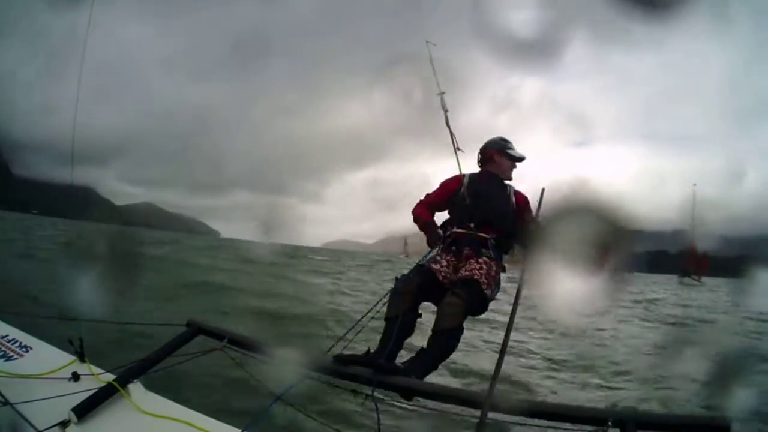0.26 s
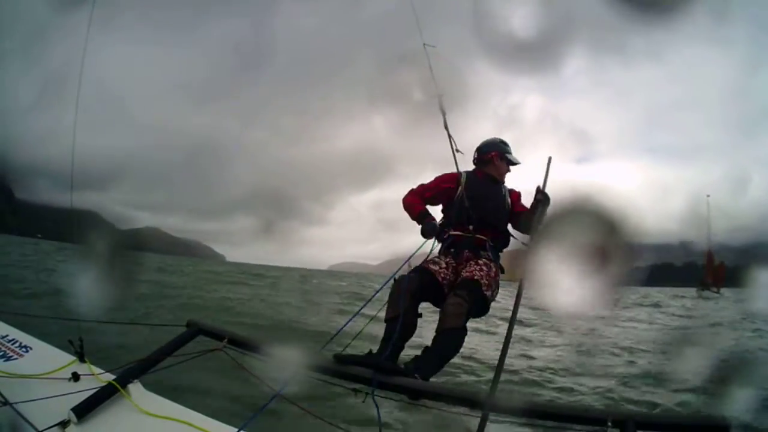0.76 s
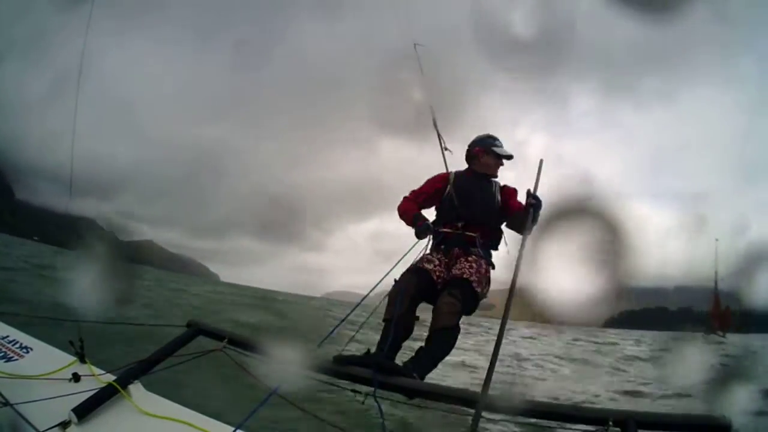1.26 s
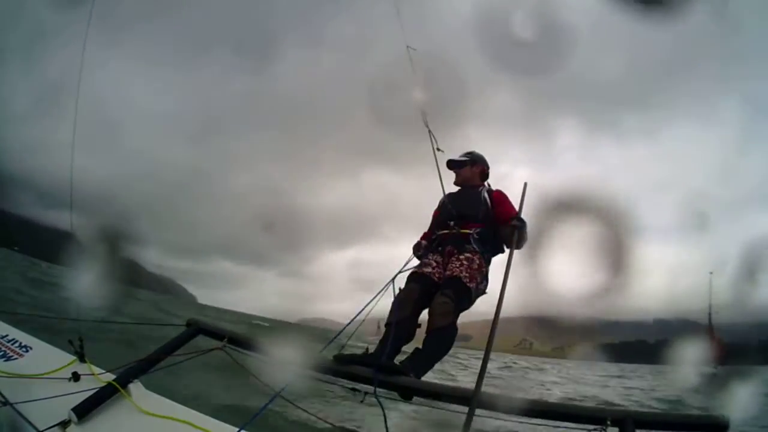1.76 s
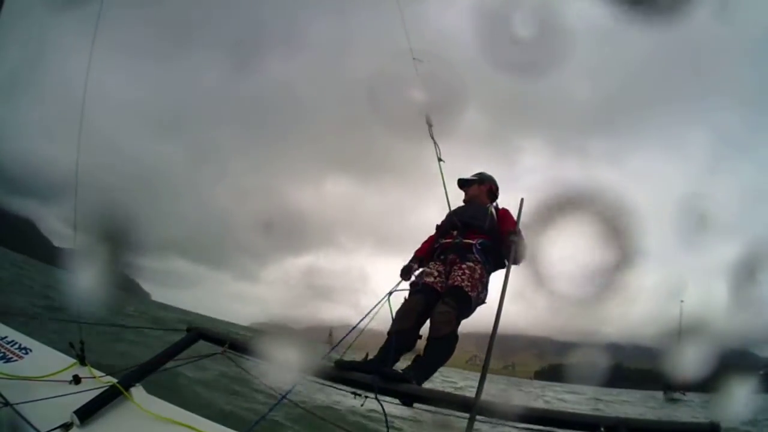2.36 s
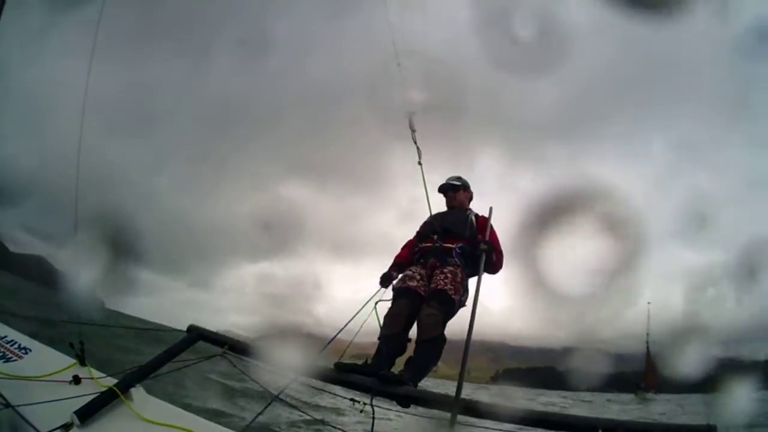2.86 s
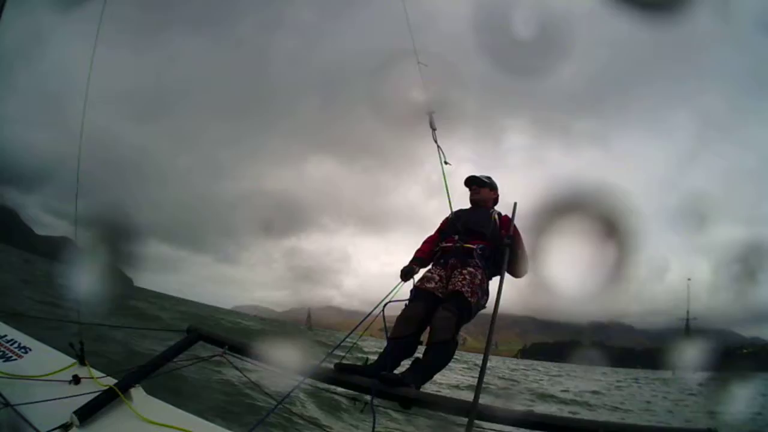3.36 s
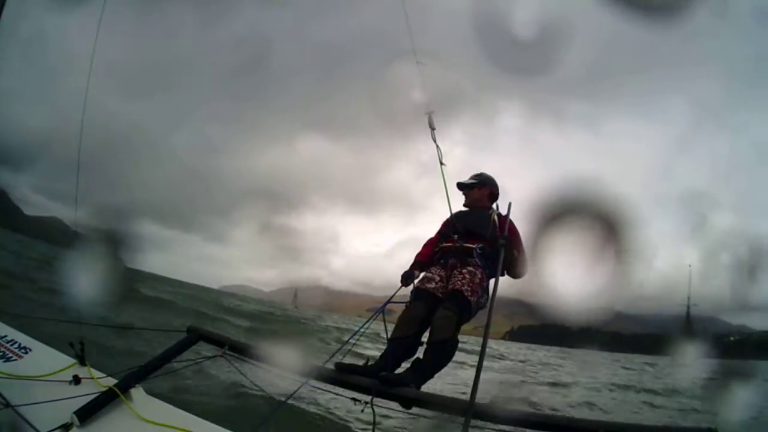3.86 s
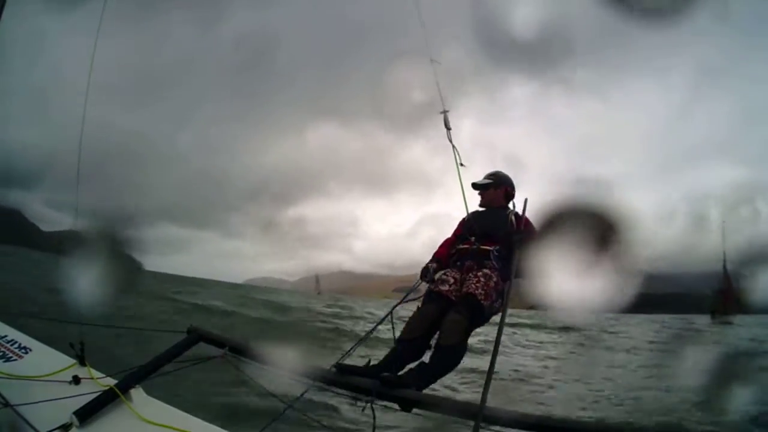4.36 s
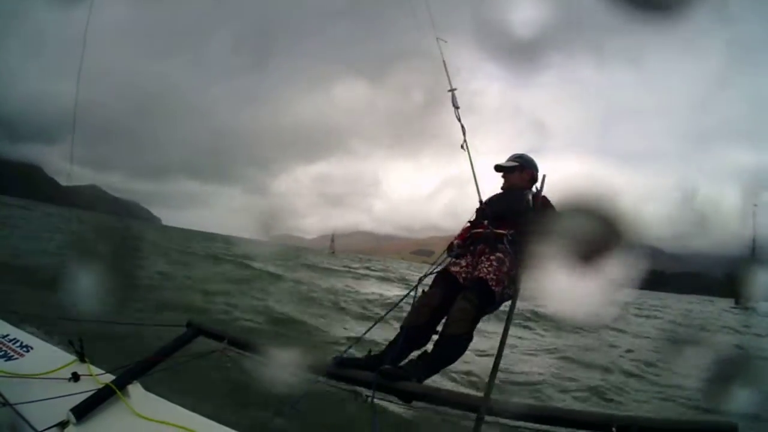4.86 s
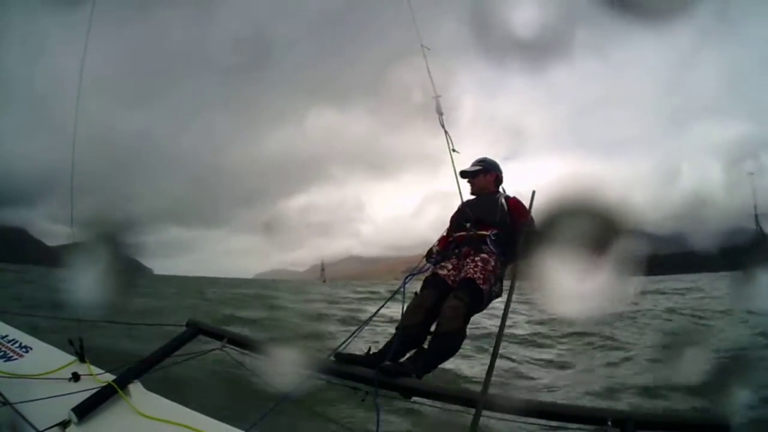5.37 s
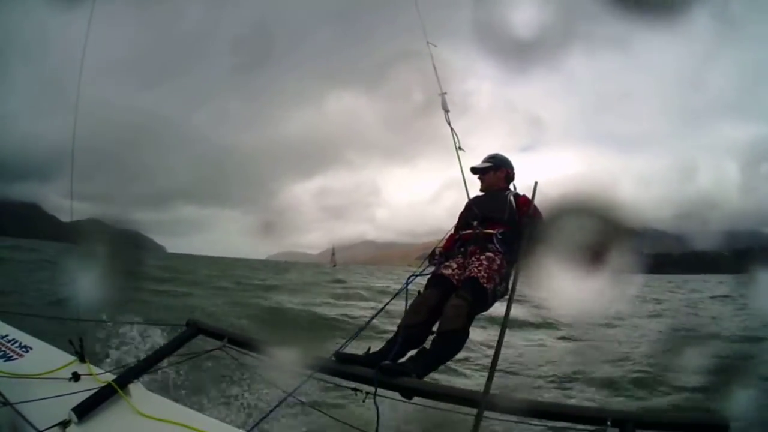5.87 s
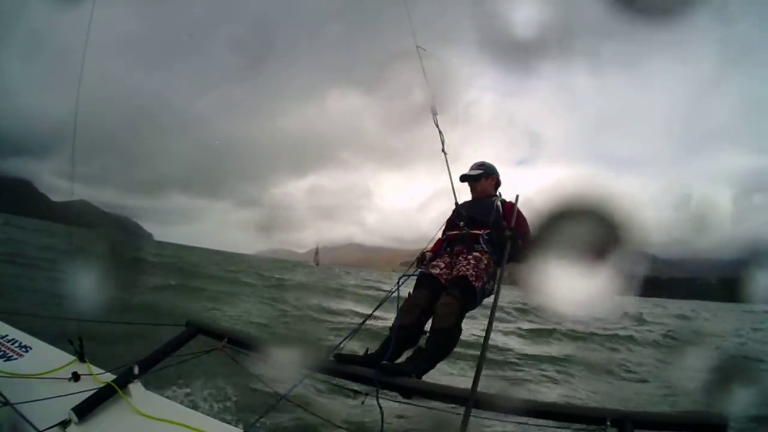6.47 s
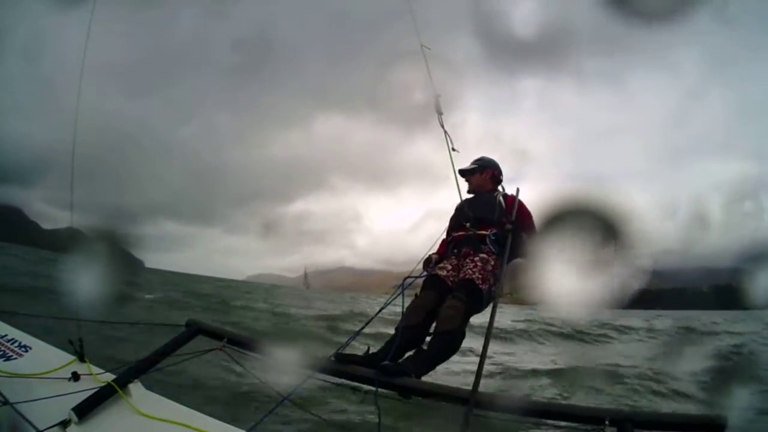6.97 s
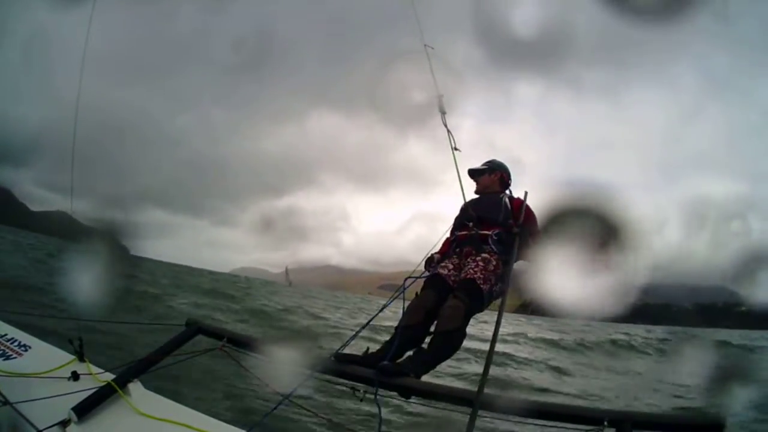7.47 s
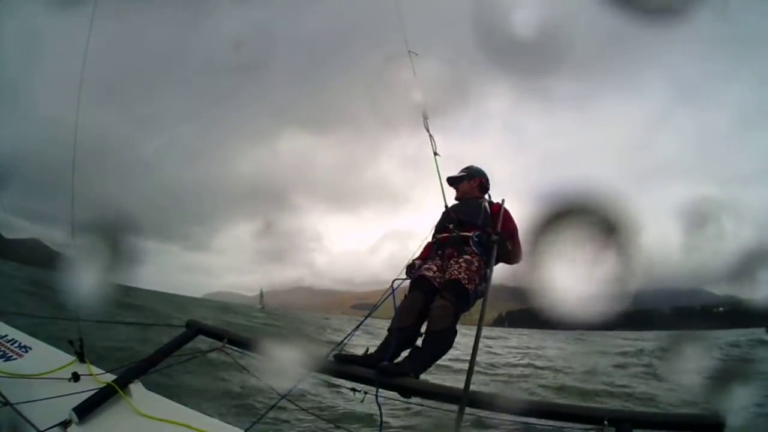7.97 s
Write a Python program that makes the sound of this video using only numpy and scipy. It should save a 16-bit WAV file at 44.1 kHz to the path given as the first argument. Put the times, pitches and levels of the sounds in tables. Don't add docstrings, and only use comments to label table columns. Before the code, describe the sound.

On the deck of a small fast dinghy in choppy water, a sealed-in microphone hears everything through the hull: boxy, dull on top, distorting on the hardest blows. From 0 to 1.7 s there is soft rushing wash, faint spray patter, very low wind and a few hollow laps. At 1.75 s a loud knock and snap begin a dense passage until about 2.9 s: rumbling hull flex, slosh, creaking rigging, short panel groans and quick irregular ratchet clicks. From 3 to 4.4 s it settles to wash with light slaps and ticks. At 4.5 s a violent jolt leads into a rope squeak, rising and wavering until 4.8 s, with another bang at 4.65 s. Then water slaps continue, with a sharp crack at 6.2 s, knocks at 7.45 and 7.75 s, and a clattering, creaking burst from 8.0 to 8.2 s.

```python
import sys
import numpy as np
from scipy import signal
from scipy.fft import rfft, irfft, next_fast_len
from scipy.io import wavfile
from scipy.ndimage import map_coordinates

SR = 44100
rng = np.random.default_rng(int(sys.argv[2]) if len(sys.argv) > 2 else 0)


def how_loud(loudness_db):
    steps = np.asarray(loudness_db, float) / 20
    return 10 ** steps


def unload_audio(sound):
    columns = np.transpose(np.atleast_2d(sound))
    steps = np.round(np.clip(columns, -1, 1) * 32767)
    wavfile.write(sys.argv[1], SR, steps.astype(np.int16))


N = 362061


def unit(x):
    return x / np.sqrt(np.mean(x ** 2) + 1e-20)


def curves(rows):
    s, *columns = np.transpose(rows)
    return [np.interp(np.arange(N) / SR, s, column) for column in columns]


def wobble(rate, size=N):
    knots = rng.standard_normal(int(size * rate / SR) + 4)
    return map_coordinates(knots, [np.arange(size) * rate / SR])


def filtered(x, response):
    m = next_fast_len(N + SR // 2)
    return irfft(rfft(x, m) * response(np.fft.rfftfreq(m, 1 / SR)), m)[..., :N]


def body(modes, damp_hz=9000):
    def response(f):
        total = 0
        for k, (hz, width, db) in enumerate(modes):
            total = total + (-1) ** k * how_loud(db) * 1j * f * width / (hz * hz - f * f + 1j * f * width)
        return total / (1 + 1j * f / damp_hz) ** 2
    return response


def shaken(level_db, response, lumpy_db, rate):
    force = unit(how_loud(lumpy_db * wobble(rate)) * rng.standard_normal(N))
    gain = np.linalg.norm(response(np.arange(SR // 2))) / np.sqrt(SR // 2)
    return filtered(how_loud(level_db) * force, response) / gain


def ring(hz, t60, modes, scatter_db, t, focus_db=3):
    out = 0
    for mode_hz, _, db in modes:
        strength, detune = rng.standard_normal(2)
        level_db = db + scatter_db * strength - focus_db * abs(np.log2(mode_hz / hz))
        out = out + how_loud(level_db) * np.sin(2 * np.pi * mode_hz * (1 + 0.033 * detune) * t)
    out = out * how_loud(-60 * t / t60) * (1 - np.exp(-t / 0.00044))
    return out / np.abs(out).max()


def events_power(times, tops_db, loss_db):
    grid = np.arange(0, N / SR, .002)
    loss = loss_db(grid - np.array(times)[:, None])
    return grid, how_loud(2 * (np.array(tops_db)[..., None] - loss)).sum(-2)


# start_s, spray_db, wash_db (along the wetted hull)
UNDER_WAY = [(0, -56, -51), (0.35, -52.5, -49.5), (0.9, -51.5, -42.5), (1.2, -51, -49),
             (1.55, -49.5, -47.5), (2.1, -52, -45), (2.7, -49, -41.5), (3.4, -47.5, -46), (3.7, -52.5, -48),
             (4.1, -51.5, -47), (4.4, -54.5, -46), (5.1, -53, -49.5), (5.6, -53.5, -48), (5.74, -54, -53),
             (5.85, -52, -45.5), (6.5, -50.5, -45), (7.2, -51.5, -48), (8.21, -53.5, -46.5)]
# crest_s, flexing_db, slosh_db, width_s
WAVE_CRESTS = [(0.222, -37.5, -40, 0.058), (0.86, -41, -47, 0.074), (1.09, -52, -41, 0.027),
               (1.741, -32, -31.5, 0.061), (1.833, -26, -24, 0.011), (1.967, -29, -27.5, 0.073),
               (2.192, -27, -26.5, 0.034), (2.283, -25, -19.5, 0.023), (2.461, -33, -20, 0.027),
               (2.5, -27.5, -25, 0.038), (2.563, -30.5, -19.5, 0.012), (2.86, -36, -45, 0.066),
               (3.28, -38, -41.5, 0.11), (3.512, -37, -36.5, 0.096), (4.308, -36.5, -35, 0.04),
               (4.652, -28.5, -20.5, 0.012), (4.72, -35.5, -31, 0.18), (5.29, -41.5, -31.5, 0.022),
               (5.51, -33.5, -27.5, 0.063), (5.575, -37.5, -45, 0.049), (5.94, -42.5, -39, 0.14),
               (6.16, -33, -30, 0.069), (6.47, -42, -42, 0.02), (6.63, -31.5, -32.5, 0.021),
               (6.79, -33, -30, 0.054), (7.01, -34, -37, 0.027), (7.241, -43, -39, 0.044),
               (7.477, -29, -29.5, 0.061), (7.67, -36, -39, 0.039), (7.8, -38.5, -36.5, 0.097),
               (8.07, -30.5, -28, 0.064), (8.14, -38, -34, 0.076)]
# start_s, held_s, creak_db, rattle_db (of the housing, over the creak)
RIG_LOADS = [(0.6, 0.1, -49, -27), (0.799, 0.086, -49, -17), (1.042, 0.043, -42, -22),
             (1.683, 0.044, -34, -31), (1.748, 0.093, -28, -25), (1.92, .038, -28, -23),
             (1.963, 0.032, -24, -23), (2.012, 0.023, -27, -26.5), (2.18, 0.21, -25, -20.5),
             (2.359, 0.059, -37.5, -25), (2.44, 0.13, -22.5, -25), (2.575, 0.054, -26.5, -28),
             (2.842, 0.019, -27, -19), (2.885, 0.031, -36, -29), (2.93, 0.033, -40, -18),
             (3.05, 0.16, -41.5, -30), (3.2, 0.087, -39.5, -26), (3.46, 0.098, -37.5, -24),
             (4.26, 0.048, -44, -28), (4.539, 0.052, -23, -27), (4.651, 0.012, -18.5, -33),
             (4.68, 0.089, -28, -9), (4.84, 0.066, -38.5, -25), (5.37, 0.05, -40, -28),
             (5.432, .04, -35, -27), (5.478, 0.06, -29.5, -27), (5.545, .05, -35.5, -29),
             (5.79, 0.045, -41, -27), (5.94, 0.1, -38, -27), (6.126, 0.078, -28.5, -27),
             (6.455, 0.023, -49, -30), (6.741, 0.077, -32.5, -18.5), (6.97, 0.053, -39, -21),
             (7.442, 0.046, -25.5, -30), (7.632, 0.05, -34.5, -36), (7.768, 0.06, -32.5, -22),
             (7.996, 0.15, -25, -20), (8.15, .03, -34, -24), (8.195, .03, -26, -21)]


def drive():
    spray_db, wash_db = curves(UNDER_WAY)

    def wave_loss(u):
        return 11 * np.maximum(-u / 0.99, u) / width[:, None]

    def load_loss(u):
        tighten, ease = -u * 896.5, (u - held[:, None]) * 453.5
        return np.maximum(np.maximum(tighten, ease), 0)

    crest, flex_db, slop_db, width = np.transpose(WAVE_CRESTS)
    grid, (flex, slop) = events_power(crest, [flex_db, slop_db], wave_loss)
    start, held, load_db, rattle_db = np.transpose(RIG_LOADS)
    grid, (load, rattle) = events_power(start, [load_db, load_db + rattle_db], load_loss)

    def both(db, power):
        return 10 * np.log10(how_loud(2 * db) + np.interp(np.arange(N) / SR, grid, power))

    return both(wash_db + 1.1, flex), both(wash_db + 1, slop), both(wash_db + 0.8, load), both(spray_db, rattle)


# pitch_hz, width_hz, level_db
HULL_FLEX = [(30, 37, -11.5), (59.4, 29, -3.5), (113, 50, -3.5), (191.8, 60.5, -1)]
# pitch_hz, width_hz, level_db
HULL_BOTTOM = [(352.5, 70, -0.5), (408, 201, -6)]
# pitch_hz, width_hz, level_db
DECK = [(570.6, 133, -6), (719.6, 195, 2), (824, 82, 2.5), (880.4, 42, 1.5), (1024, 108, -0.5),
        (1120, 82, 2), (1300, 130, 1)]
# pitch_hz, width_hz, level_db
LOADED_DECK = [(720, 160, -5.5), (840, 110, 3.5), (990, 180, -3), (1110, 45, 4.5), (1240, 13, -4.5)]
# pitch_hz, width_hz, level_db
BLOCK_MOUNT = [(1040, 500, -5.5), (2110, 370, -0.5), (2560, 700, -9.5), (3920, 970, -23)]
# pitch_hz, width_hz, level_db
HOUSING = [(1576, 230, -5.5), (2184, 327, -4), (2705, 246, -1.5), (3223, 210, -8.5), (4060, 1200, -10.5),
           (4980, 1500, -19.5)]


def water():
    rumble_db, slosh_db, creak_db, spray_db = drive()
    surge = wobble(19)
    creak_db = np.minimum(creak_db, -21)
    load_db = np.clip(0.94 * (creak_db + 26.0), -20, 0)
    loaded_db = creak_db + load_db
    hum_db = creak_db + 7.65 - 0.32 * (load_db + 24.5) + 0.37 * surge
    chafe_db = loaded_db - 12.5 + np.minimum(spray_db + 47.0, 0)

    rumble = shaken(rumble_db - 0.6 + 1.2 * surge, body(HULL_FLEX, damp_hz=704), lumpy_db=-0.5, rate=24)
    slosh = shaken(slosh_db - 0.5 + surge, body(HULL_BOTTOM, damp_hz=1210), lumpy_db=2.5, rate=30)
    hum = shaken(hum_db, body(DECK, damp_hz=2330), lumpy_db=2.5, rate=90)
    creak = shaken(loaded_db - 1.5, body(LOADED_DECK, damp_hz=2510), lumpy_db=1.5, rate=54)
    chafe = shaken(chafe_db, body(BLOCK_MOUNT[1:3], damp_hz=4000), lumpy_db=4.5, rate=79)
    spray = shaken(spray_db - 0.6 + 0.49 * surge, body(HOUSING), lumpy_db=1.5, rate=120)
    breeze = filtered(rng.standard_normal(N), lambda hz: 1 / (1 + (hz / 60) ** 2))
    wind = how_loud(-52.5) * unit(breeze)
    return rumble + slosh + hum + creak + chafe + spray + wind


# start_s, peak_db, pitch_hz, t60_s
DECK_JOLTS = [(1.746, -4, 1056, 0.12), (1.919, -26, 1110, 0.17), (1.962, -2, 712, 0.12),
              (2.168, -12, 936, 0.12), (2.194, -15.5, 933, 0.1), (2.216, -11.5, 857, 0.34),
              (2.355, -19.5, 910, 0.13), (2.388, -14, 1026, 0.071), (2.446, -14.5, 770, 0.1),
              (2.484, -19, 1054, 0.21), (2.5595, 2.5, 928, 0.055), (2.843, -7, 911, 0.1),
              (2.891, -17.5, 798, 0.36), (2.913, -22, 1090, 0.056), (4.484, 5.5, 1110, 0.086),
              (4.545, -8, 855, 0.099), (4.646, 2.5, 876, 0.067), (4.732, -14.5, 1110, 0.083),
              (6.186, -2.5, 1027, 0.098), (7.441, -10.5, 1300, 0.12), (7.46, -0.5, 1110, 0.039),
              (7.758, -18.5, 907, 0.43), (7.994, -5, 1045, 0.12), (8.008, -10, 1013, 0.13),
              (8.063, 2, 998, 0.06), (8.193, -10, 1120, .09)]
# start_s, peak_db, pitch_hz
HULL_SLAPS = [(0.201, -13, 673), (0.912, -20, 1352), (1.555, -21.5, 714), (1.681, -24.5, 1384),
              (1.696, -14, 1300), (2.766, -19, 1292), (3.483, -30.5, 845), (4.221, -21, 774),
              (4.295, -22.5, 780), (4.411, -14.5, 1110), (4.896, -23, 863), (4.968, -17, 780),
              (5.064, -19, 807), (5.285, -18, 1224), (5.429, -21.5, 603), (5.478, -13.5, 866),
              (5.526, -13.5, 850), (5.897, -20.5, 678), (5.955, -14.5, 892), (6.131, -13, 782),
              (6.149, -12.5, 800), (6.278, -11.5, 1120), (6.375, -19.5, 658), (6.397, -19.5, 1110),
              (6.62, -20, 1284), (6.742, -19.5, 1370), (6.771, -13, 695), (6.954, -20, 1316),
              (6.985, -12, 840), (7.189, -10.5, 718)]
# start_s, peak_db, pitch_hz
BOW_LAPS = [(0.034, -24.5, 640), (0.06, -26.5, 1040), (0.466, -27.5, 1330), (0.698, -26, 1210),
            (0.839, -22.5, 727), (1.082, -22.5, 774), (1.406, -19.5, 1110), (3.042, -23, 687),
            (4.099, -24.5, 1250), (4.264, -27, 1110), (4.841, -20, 734), (5.345, -23, 733),
            (5.384, -23, 762), (5.657, -25, 1370), (5.933, -22, 820), (5.997, -18, 640), (6.029, -28, 750),
            (6.456, -21.5, 620), (7.249, -23, 670), (7.368, -21, 677), (7.394, -23, 1273),
            (7.418, -22, 1040), (7.53, -33, 1240), (5.565, -20, 1320), (5.587, -21, 1320),
            (5.788, -24, 700), (6.018, -22, 900), (6.04, -23, 800), (5.068, -20, 1150), (4.412, -22, 760),
            (6.986, -20, 1200)]


def knocks():
    out, t = np.zeros(N + SR), np.arange(SR // 5) / SR
    # t60 in s, then thud in dB
    blows = [(*row, -18) for row in DECK_JOLTS]
    blows += [(*row, 0.08, -11) for row in HULL_SLAPS]
    blows += [(*row, 0.061, -4.5) for row in BOW_LAPS]
    for s, db, hz, t60, thud_db in blows:
        panel = ring(hz, max(t60, .02), DECK + [(hz, 0, 12)], 2.5, t, focus_db=8)
        thud = how_loud(thud_db) * ring(360, .08, HULL_BOTTOM, 3, t)
        out[round(s * SR):][:len(t)] += how_loud(db - 5.0) * (panel + thud)
    return out[:N]


# start_s, length_s,
# peak_db, pitch_hz
PANEL_GROANS = [(1.756, 0.032, -21, 1051), (1.775, 0.053, -22.5, 798), (1.83, 0.027, -28, 1160),
                (1.909, .018, -27.5, 784), (2.017, 0.022, -16.5, 1073), (2.272, 0.031, -17.5, 944),
                (2.467, 0.07, -19.5, 1085), (2.579, 0.041, -21, 1007), (2.558, 0.012, -15, 1200),
                (2.85, 0.027, -17, 1140), (2.864, 0.015, -20.5, 802), (2.905, 0.015, -21, 1132),
                (4.486, 0.015, -11, 846), (4.649, .014, -12.5, 720), (4.676, 0.011, -12, 1300),
                (6.186, .012, -11.5, 1372), (6.19, 0.018, -13, 849), (6.275, 0.027, -29.5, 1138),
                (7.765, 0.016, -21, 927), (7.8, 0.063, -27, 1134), (8.025, .014, -16, 1040),
                (8.041, 0.019, -11.5, 1084), (8.0625, .024, -5.5, 760), (8.086, .013, -10.5, 1150),
                (5.53, .085, -30.5, 189.7), (5.88, 0.064, -36.5, 186), (7.64, .06, -35, 181),
                (4.68, .1, -31.5, 111.3), (1.968, .026, -15, 735), (6.283, 0.015, -24, 906),
                (4.492, .008, -8, 996), (8.077, 0.036, -13.5, 1120), (8.119, 0.03, -14.5, 1120),
                (8.19, 0.041, -16.5, 1120)]


def groans():
    out = np.zeros(N + SR)
    waver = np.pad(0.011 * wobble(200), (0, SR))
    flutter_db = np.pad(1.5 * wobble(180), (0, SR))
    for s, length, db, hz in PANEL_GROANS:
        span = slice(round(s * SR), round((s + max(length, .005)) * SR))
        swell = np.sin(np.linspace(0, np.pi, span.stop - span.start))
        phase = 2 * np.pi * np.cumsum(hz * (1 + waver[span])) / SR
        out[span] += how_loud(db + flutter_db[span]) * swell * np.sin(phase)
    return out[:N]


# start_s, slip_rate_hz, level_db, brightness_db
ROPE_SLIP = [
    (4.533, 373, -21, -16),
    (4.549, 404, -15, -7.5),
    (4.575, 452, -11.5, -6),
    (4.599, 520, -16.5, -5.5),
    (4.625, 530.5, -18, 0.5),
    (4.72, 548, -13, -3.5),
    (4.775, 556.5, -21, -2.5),
    (4.793, 517.7, -18.5, -22.5),
    (4.813, 480.5, -47, -14.5),
]
# multiple, level_db
SLIP_PARTIALS = [(1, 9.5), (1.5, -21), (2, -1), (3, 0), (4, -4.5), (5, -4.5), (6, -5)]
# pitch_hz, width_hz, level_db
BLOCK_CHEEKS = [(938, 380, 0), (1300, 420, -2), (2195, 340, 0), (2730, 290, -5)]


def squeak():
    first, last = round(ROPE_SLIP[0][0] * SR), round(ROPE_SLIP[-1][0] * SR)
    hz, db, bright_db = [c[first:last] for c in curves(ROPE_SLIP)]
    size = last - first
    from_end = np.minimum(np.arange(size), np.arange(size)[::-1])
    on = np.clip(from_end / (0.01 * SR), 0, 1) * how_loud(db)
    phase = 2 * np.pi * np.cumsum(hz * (1 + .009 * wobble(250, size))) / SR
    stack = 0
    for k, level_db in SLIP_PARTIALS:
        partial_db = level_db + bright_db * (k > 3) + 2.8 * wobble(130, size)
        stack = stack + how_loud(partial_db) * np.sin(k * phase)
    puffs = (1 + np.cos(phase)) * rng.standard_normal(size)
    scrape = how_loud(bright_db + 4 * wobble(160, size)) * puffs

    def placed(x):
        return np.pad(on * x, (first, N - last))

    tone = filtered(placed(how_loud(1.2) * stack), lambda f: body(BLOCK_CHEEKS)(f) ** 2)
    return tone + filtered(placed(how_loud(4.0) * scrape), body(BLOCK_MOUNT, damp_hz=6000))


# start_s, peak_db, pitch_hz, t60_s
DRY_SNAPS = [(0.1994, -41, 2080, 0.012), (1.4062, -34, 2260, 0.012), (1.9056, -25.5, 2060, 0.012),
             (1.9864, -23, 2290, 0.012), (2.0143, -13.5, 2100, 0.012), (2.1675, -16, 2160, 0.012),
             (2.2233, -14, 2090, 0.012), (2.2672, -13.5, 2100, 0.01), (2.3111, -11.5, 2220, 0.012),
             (2.3476, -20, 2310, 0.012), (2.387, -16, 2230, 0.011), (2.4409, -14, 2220, 0.012),
             (2.4818, -11.5, 2170, 0.012), (2.5014, -17, 2090, 0.012), (2.5242, -18, 2390, 0.012),
             (2.5551, -17, 2250, 0.012), (2.6179, -27, 2250, 0.012), (2.8364, -18.5, 2240, 0.012),
             (2.8514, -20, 2230, 0.013), (2.9063, -30, 2240, 0.012), (4.4114, -30, 2010, 0.012),
             (4.5565, -17, 2250, 0.011), (4.9681, -37, 2360, 0.012), (5.0649, -40, 2730, 0.012),
             (5.2814, -38, 2370, 0.012), (6.3195, -32, 2730, 0.012), (6.3964, -19, 2010, 0.012),
             (6.5191, -39, 2040, 0.012), (6.8054, -33, 2100, 0.012), (7.1876, -38.5, 2290, 0.012),
             (7.4579, -15.5, 2250, 0.015), (7.7588, -17, 2210, 0.013), (7.7972, -26.5, 2090, 0.012),
             (7.9857, -22, 2220, 0.012), (8.0321, -15, 2120, 0.012), (8.115, -23, 2220, 0.012),
             (8.1873, -8, 2100, 0.014)]
# start_s, peak_db, pitch_hz, t60_s
BRIGHT_TINKS = [(1.8287, -41, 4030, 0.02), (1.9051, -30, 4050, 0.02), (2.175, -32, 4170, 0.02),
                (2.3554, -34, 4200, 0.02), (2.6294, -42, 4160, 0.02), (2.9477, -32, 4300, 0.02),
                (3.3807, -39, 4230, 0.02), (4.2617, -48, 3810, 0.02), (4.2941, -43, 3820, 0.02),
                (4.5934, -37, 4130, 0.02), (4.6758, -33, 3740, 0.02), (4.7042, -33, 3770, 0.02),
                (4.7371, -28.5, 3380, 0.02), (4.7456, -26, 3730, 0.02), (4.7644, -34, 3930, 0.02),
                (4.8948, -41, 4060, 0.02), (4.9676, -42, 4200, 0.02), (6.3609, -39, 4270, 0.02),
                (6.396, -30, 4130, 0.02), (6.7411, -37, 4230, 0.02), (7.7674, -40, 4180, 0.02),
                (7.8054, -47, 4220, 0.02), (8.1145, -31, 3950, 0.02)]


def snaps():
    out, push, t = np.zeros(N + SR), np.zeros(N), np.arange(SR // 20) / SR
    for s, db, hz, t60 in DRY_SNAPS + BRIGHT_TINKS:
        decay_db = -60 * t / max(t60, .003)
        out[round(s * SR):][:len(t)] += how_loud(db - 6.0 + decay_db) * np.sin(2 * np.pi * hz * t)
        push[round(s * SR)] = how_loud(db + 11.0)
    return out[:N] + filtered(push, body(DECK[4:] + HOUSING))


# start_s, peak_db, crack_db
RATCHET_TEETH = [(1.745, 1, -10), (1.9405, -28, -17), (1.966, -24, -29), (2.013, -14, -27),
                 (2.1677, -15, -13), (2.223, -13.5, -19), (2.2665, -13, -15.5), (2.3099, -13.5, -14),
                 (2.3463, -19, -16), (2.386, -14.5, -11), (2.439, -15, -15), (2.4838, -9, -16),
                 (2.5231, -15.5, -15), (2.555, -11.5, -19), (2.619, -29.5, -28), (2.839, -17.5, -25),
                 (2.905, -30.5, -23.5), (4.487, -12.5, -16), (4.5418, -22, -44), (4.646, -7, -26),
                 (4.805, -28, -37), (6.1846, 2.5, -10.5), (6.2768, -33, -29), (7.4568, -15, -20.5),
                 (7.7585, -17.5, -9.5), (7.986, -18, -16.5), (8.032, -15, -16.5), (8.064, -11.5, -12.5),
                 (8.1149, -17, -17), (8.187, -12, -12.5)]
# start_s, peak_db, crack_db
FITTING_TICKS = [(0.2004, -42, -21), (1.2965, -41, -2), (1.406, -35, -15), (1.6955, -34, -24),
                 (1.7927, -33, -26), (1.8216, -28, -23), (1.905, -31, 0), (2.8848, -33, -21),
                 (2.9478, -32.5, -1), (3.3133, -35, -18), (3.38, -45, 2), (4.22, -31, -12),
                 (4.2632, -37.5, -13), (4.2948, -36.5, -7), (4.4112, -30.5, -10.5), (4.895, -43, 3.5),
                 (4.968, -36, -6), (5.065, -39.5, -15), (5.281, -32, -19), (5.9553, -38, -26),
                 (6.3186, -37, -8), (6.362, -44, 4), (6.3964, -31, -3), (6.4258, -39, -21),
                 (6.5196, -38, -24), (6.7423, -44, 9.5), (6.797, -33, -13), (7.188, -33, -32),
                 (7.7972, -26.5, -8), (7.9389, -36, -13)]
# pitch_hz, width_hz, level_db
STRUCK_HOUSING = [(1730, 0, -9.5), (2183, 0, 2), (2700, 0, -8), (3478, 0, -15), (4200, 0, -7),
                  (4944, 0, -20.5)]
# pitch_hz, width_hz, level_db
THIN_METAL = [(2220, 0, -5), (2860, 0, 0)]


def clicks():
    out, rattle, crack = np.zeros((3, N + SR))
    t = np.arange(SR // 8) / SR
    strikes = [(*row, 2100, 0.97) for row in RATCHET_TEETH] + [(*row, 1956, 0.71) for row in FITTING_TICKS]
    for s, db, crack_db, hz, length in strikes:
        span = slice(round(s * SR), round(s * SR) + len(t))
        housing = ring(hz, .038 * length, STRUCK_HOUSING + [(hz, 0, 3)], 2.5, t)
        tail = how_loud(-21) * ring(2900, .15, THIN_METAL, 2, t)
        out[span] += how_loud(db - 4.5) * (housing + tail)
        rattle_db = db + 6.5 - 60 * t / (0.054 * length)
        rattle[span] += how_loud(rattle_db) * rng.standard_normal(len(t))
        burst_db = db + crack_db + 22.0 - 60 * t / (0.026 * length)
        crack[span] += how_loud(burst_db) * rng.standard_normal(len(t))
    loose_parts = body(DECK[4:6] + HOUSING[:3] + BLOCK_MOUNT[1:3], damp_hz=3700)
    return out[:N] + filtered(rattle[:N], loose_parts) + filtered(crack[:N], body(HOUSING[3:]))


def scene():
    return (water() + knocks() + groans() + squeak() + snaps() + clicks())[None]


def roll_off(x):
    return signal.sosfilt(signal.butter(12, 16520, fs=SR, output="sos"), x)


def record(dry):
    def narrow_band(hz):
        return 1 / np.sqrt(1 + (hz / 5640) ** 46) * hz / np.hypot(hz, 18)

    narrow = filtered(np.clip(dry, -.77, .77), narrow_band)
    clipped = np.clip(narrow - .0084, -.715, .715)
    mix = filtered(clipped, lambda hz: 1 / (1 + (hz / 15900) ** 60))
    return roll_off(mix)


dry = scene()
out = record(dry)
unload_audio(out)
```